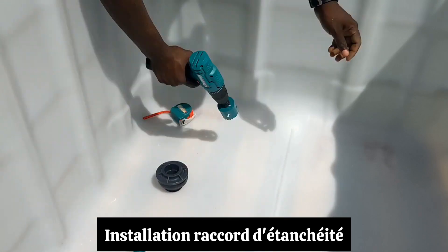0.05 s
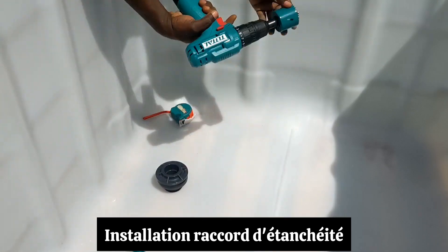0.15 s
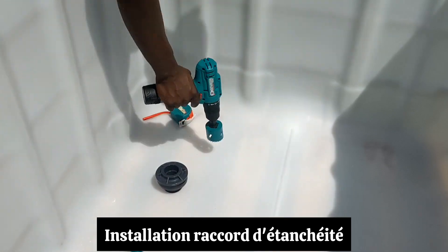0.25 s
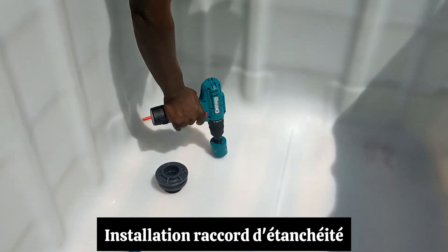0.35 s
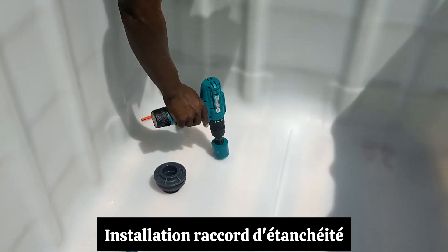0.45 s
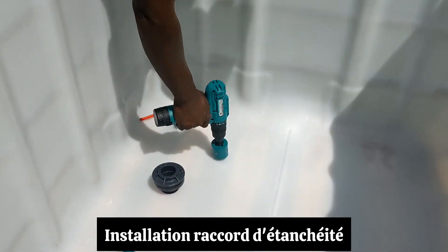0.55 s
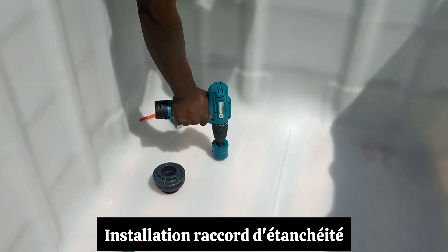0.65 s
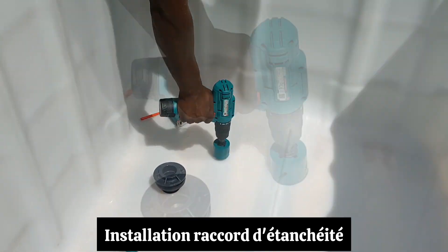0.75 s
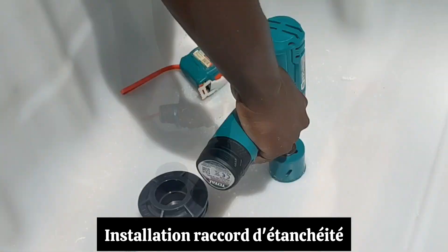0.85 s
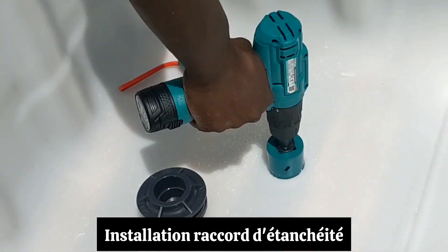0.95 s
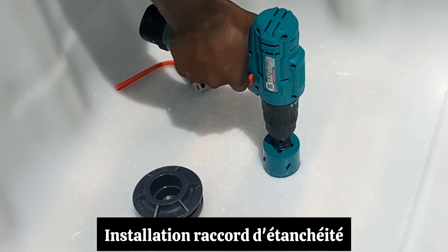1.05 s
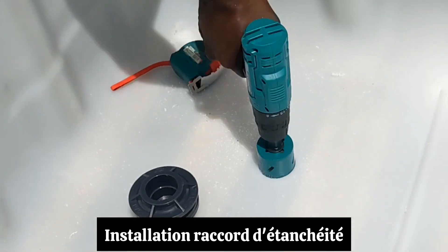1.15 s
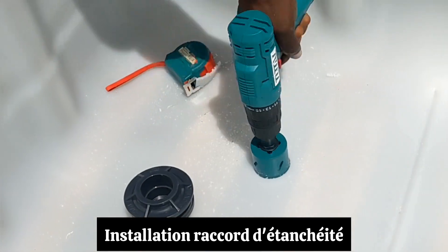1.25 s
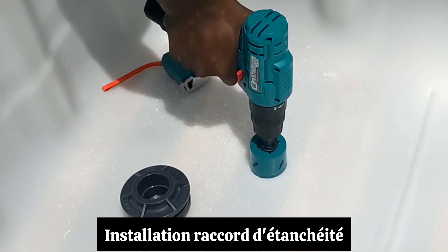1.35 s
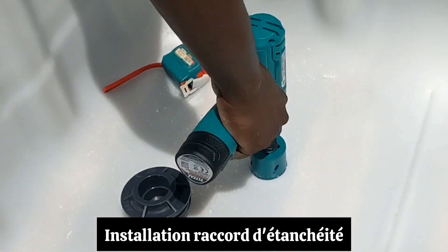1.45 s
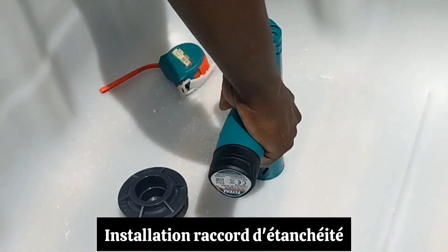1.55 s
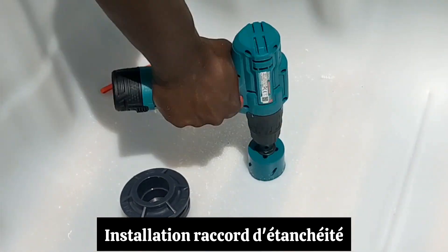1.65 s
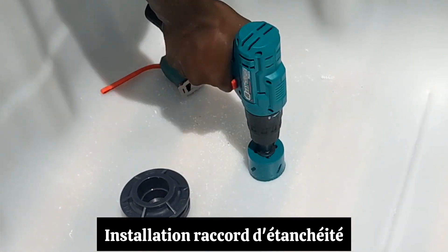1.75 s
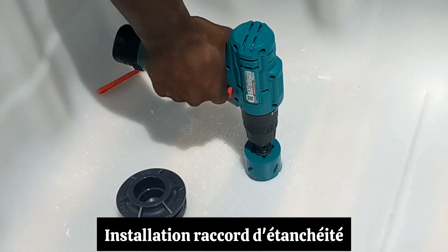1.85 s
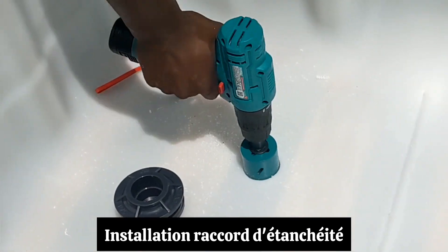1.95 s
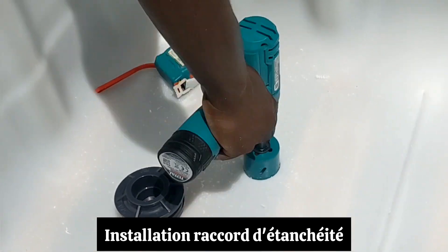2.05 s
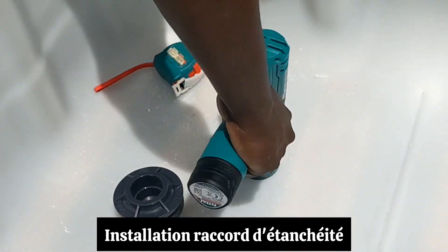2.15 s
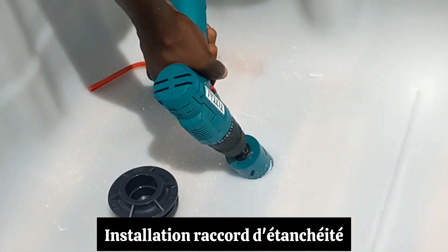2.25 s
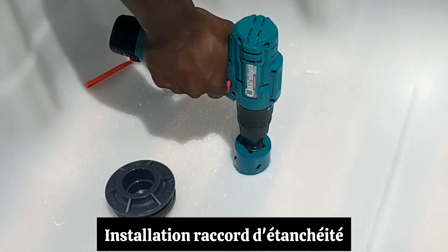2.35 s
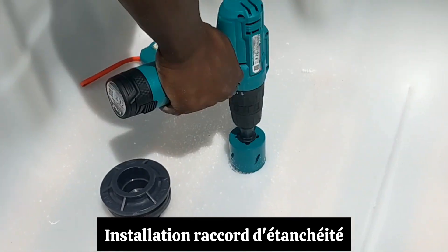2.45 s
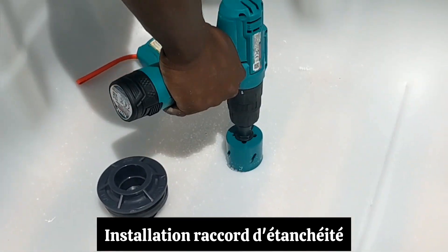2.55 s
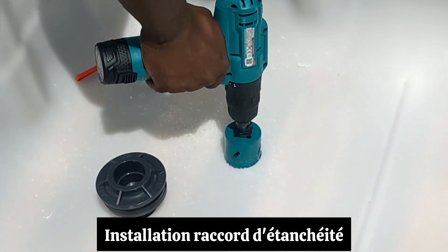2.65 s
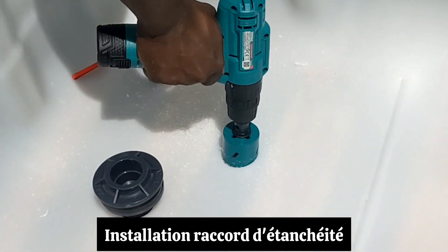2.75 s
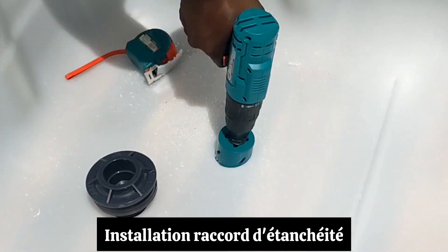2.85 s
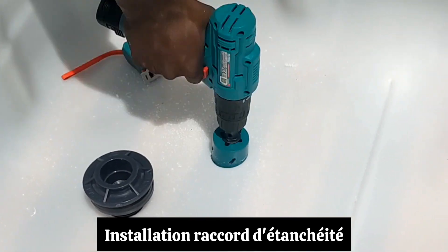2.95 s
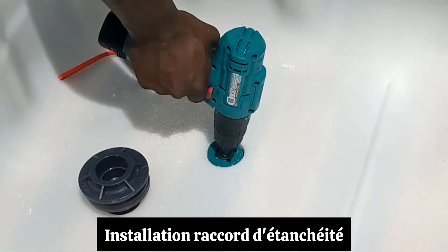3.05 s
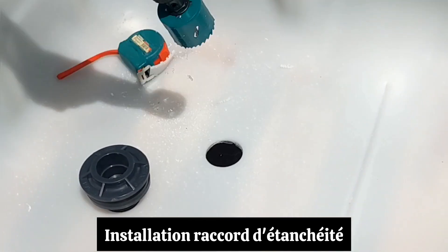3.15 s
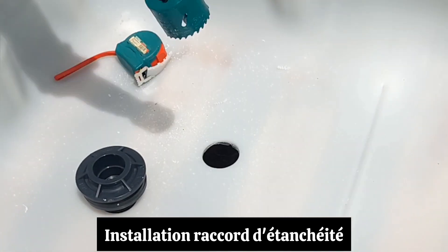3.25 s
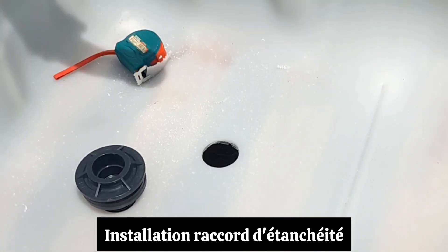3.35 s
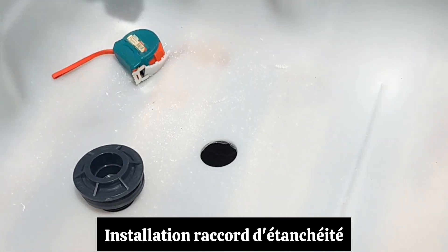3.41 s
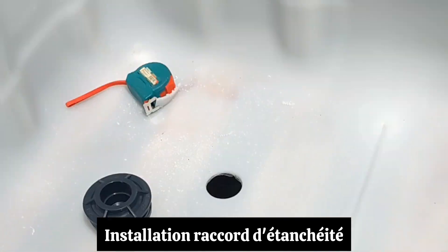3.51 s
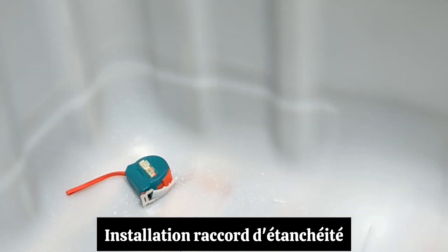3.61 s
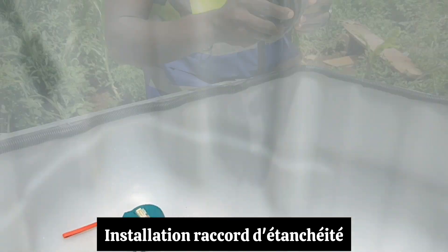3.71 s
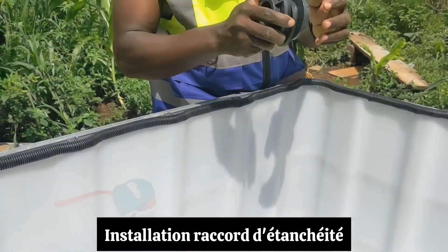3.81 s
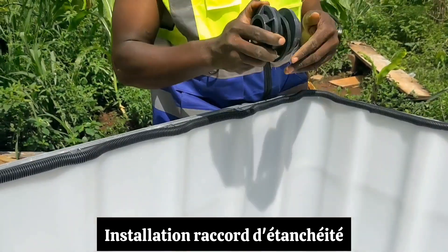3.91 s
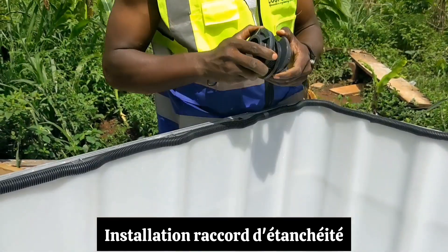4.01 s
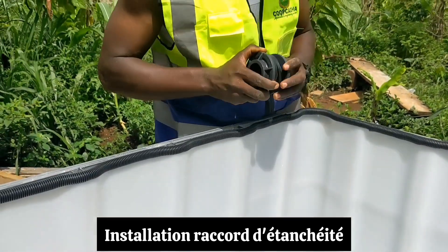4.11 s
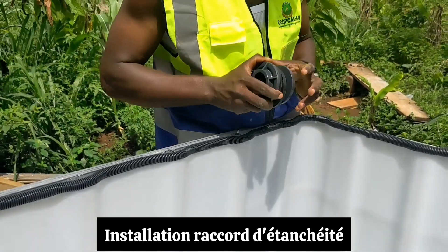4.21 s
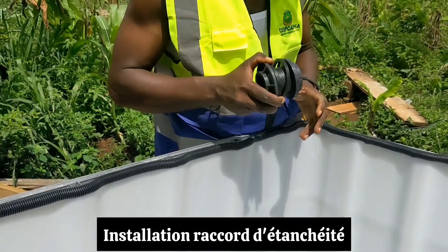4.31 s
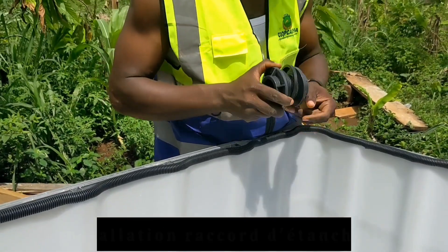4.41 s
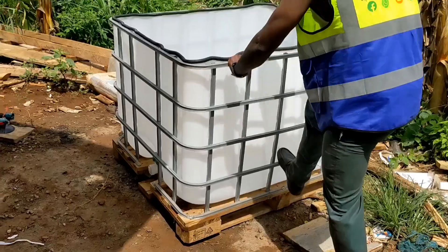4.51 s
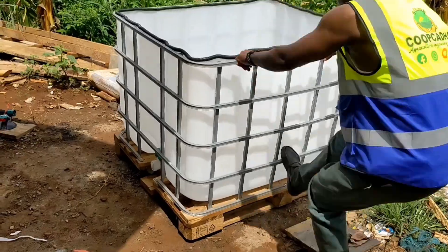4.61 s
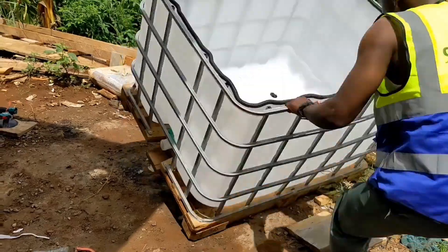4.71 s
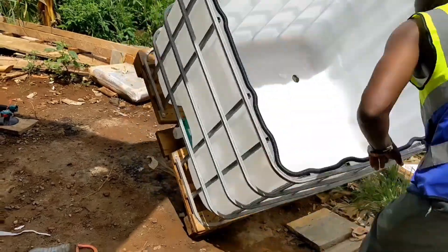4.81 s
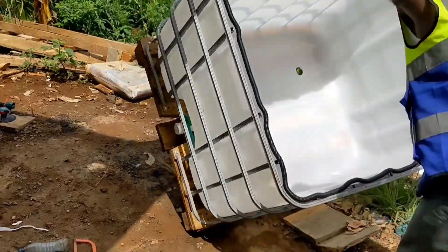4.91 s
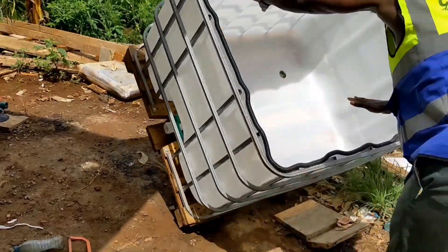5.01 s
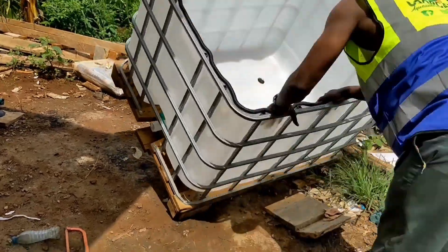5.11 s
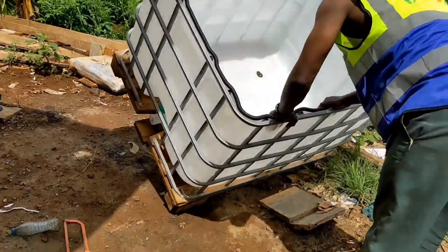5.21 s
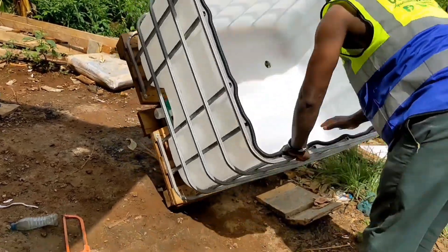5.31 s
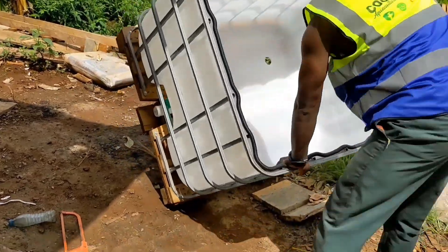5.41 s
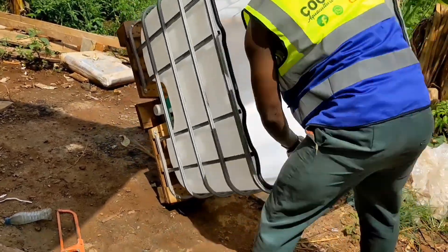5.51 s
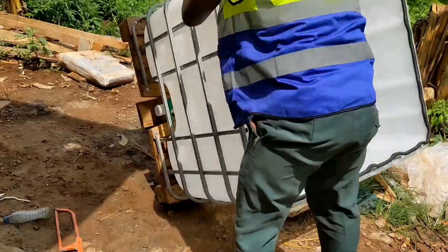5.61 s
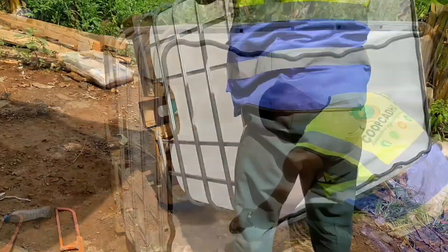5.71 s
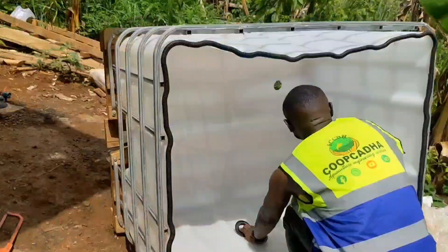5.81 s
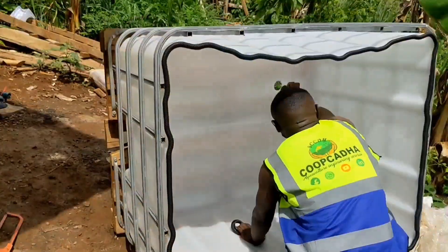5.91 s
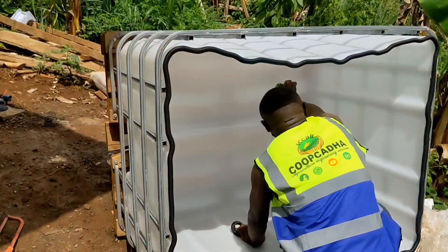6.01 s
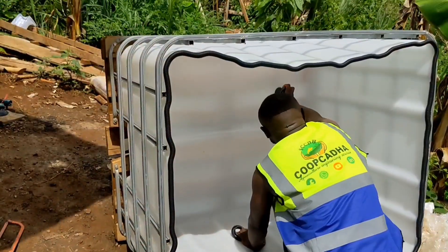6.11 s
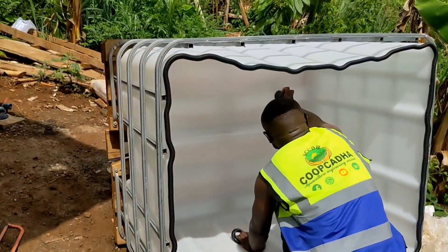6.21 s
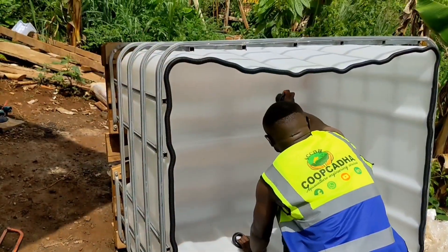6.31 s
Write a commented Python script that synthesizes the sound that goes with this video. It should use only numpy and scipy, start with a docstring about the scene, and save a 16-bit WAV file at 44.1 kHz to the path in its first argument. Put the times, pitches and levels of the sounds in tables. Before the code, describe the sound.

Heard close up outdoors, a cordless drill with a hole saw grinds loudly through a plastic tank, its whine dipping under load while the thin floor drums along. After about two and a half seconds the saw breaks through with a crack, and the drill gives a few short bursts and stops. A light gust and small handling clicks follow, then the tank tips with dull booms, clatter and scraping before settling into faint open air.

```python
"""Hole saw in a plastic tank.

Outdoors, a cordless drill drives a hole saw through the floor of an open tank. The teeth rasp and
throb, the gear whine sags under load, and the thin floor drums in forced vibration. The saw breaks
through and is blipped free. Then wind rumbles, and the caged tank is tipped over: impacts excite its
hollow modes, fittings click, and sliding friction makes a gritty scrape."""
import sys
import numpy as np
from scipy import signal
from scipy.fft import rfft, irfft
from scipy.io import wavfile

SR = 44100
rng = np.random.default_rng(int(sys.argv[2]) if len(sys.argv) > 2 else 0)


def wav_record(signal):
    """Record a signal, one row per channel, as 16-bit PCM in the file named by sys.argv[1]."""
    frames = np.transpose(np.atleast_2d(signal))
    bounded = np.clip(frames, -1, 1)
    # unit amplitude maps onto the largest positive 16-bit level
    quanta = np.round(bounded * 32767).astype(np.int16)
    wavfile.write(sys.argv[1], SR, quanta)


N = 280608
TIME = np.arange(N) / SR
BIN_HZ = np.maximum(np.fft.rfftfreq(N, 1 / SR), 1)

# trigger pulls: (pressed [s], released [s], free-running hiss [dB])
TRIGGER_PULLS = [(0.612, 1.533, -31), (1.596, 1.917, -29.5), (1.976, 3.122, -25.5), (3.253, 3.286, -24),
                 (3.321, 3.379, -24), (3.484, 3.539, -32)]
# drill speed, sagging as the hand pushes: (time [s], gear mesh frequency [Hz])
MESH_SPEED = [(0.92, 2136), (1.02, 2079), (1.13, 2180), (1.4, 2194), (1.63, 1980), (1.745, 1886),
              (1.8, 1988), (1.92, 2017), (1.99, 2150), (2.11, 2104), (2.236, 1940), (2.29, 2130),
              (2.42, 1923), (2.6, 1893), (2.705, 1795), (2.785, 1879), (2.865, 1754), (3.02, 2002)]
# overtones of the whine: (harmonic number, relative level [dB])
MESH_OVERTONES = [(2, 2), (3, -0.5), (4, 3.5), (5, 0), (7, -13)]
# the saw squeals on one harmonic: (start [s], end [s], harmonic number, level [dB])
SAW_SQUEALS = [(0.88, 0.95, 1, -27.5), (1.69, 1.84, 1, -23), (1.73, 1.77, 2, -25), (2.17, 2.24, 1, -27.5),
               (2.44, 2.61, 1, -23), (2.69, 2.73, 1, -21.5), (2.66, 2.88, 2, -26), (2.78, 2.905, 3, -27.5)]
# the saw snags and shakes the floor: (start [s], end [s], drumming level [dB])
SAW_SNAGS = [(1.24, 1.273, -23.5), (1.34, 1.384, -28), (2.0, 2.055, -26.5), (2.23, 2.352, -20.5),
             (3.04, 3.074, -17.5)]
# one floor mode hums under the hardest push: (time [s], level [dB])
FLOOR_HUM_LEVELS = [(2.15, -26), (2.5, -33), (2.64, -19.5), (2.75, -19.5), (2.85, -31.5), (3.0, -35)]
# resonances of saw cup and drill housing: (centre [Hz], width [Hz], gain [dB])
HOUSING_RESONANCES = [(687, 200, 6.5), (958, 52, 3.5), (1075, 80, 0), (2040, 110, -2), (2554, 300, 5),
                      (3570, 220, 1.5), (4380, 40, -5.5), (5620, 170, 2.5), (6600, 150, 1), (7600, 200, 1),
                      (8700, 350, 2)]
# motor chirps: (time [s], duration [s], from [Hz], to [Hz], level [dB], pitch wobble [fraction])
MOTOR_GLIDES = [(0.568, 0.06, 3100, 3140, -39, .012), (0.62, 0.055, 1000, 1060, -40, .015),
                (3.224, 0.03, 3150, 3420, -32, .02), (3.325, 0.045, 3000, 1900, -36, .09),
                (3.36, 0.03, 950, 790, -30, .04), (3.52, 0.03, 760, 560, -34, .06)]
# modes of the tank: (frequency [Hz], level [dB], t60 [s])
TANK_MODES = [(72, -25, .10), (105, -5, 0.11), (139, 3.5, 0.027), (182, -8.5, 0.11), (250, -5, 0.055),
              (325, -7.5, 0.025), (403, -13, .04), (543, -5.5, 0.034), (660, -17, 0.044), (847, -11, .03)]
# blows on the tank: (time [s], level [dB], contact time [s])
TANK_BLOWS = [(0.0, -12.5, 0.0017), (0.126, -41, 0.0049), (0.176, -30, 0.0025), (0.189, -15, 0.0025),
              (0.206, -8, 0.0029), (0.302, -25.5, 0.0014), (0.37, -37.5, 0.0017), (2.254, -5.5, 0.0022),
              (2.322, -18, 0.0016), (3.033, -8, 0.0012), (3.053, -5, 0.0022), (3.085, -13, 0.0024),
              (4.73, -12, 0.001), (4.739, -17, 0.0014), (4.884, -12, 0.00107), (5.018, -15, 0.00098),
              (5.057, -10, .002), (5.101, -14, 0.0013)]
# handling clicks, and cracks as the disc breaks out: (time [s], body [dB], bright edge [dB], t60 [s])
CLICK_EVENTS = [(0.021, -50, -45.5, 0.073), (0.194, -52.5, -60.5, 0.11), (0.304, -40, -55.5, 0.055),
                (3.025, -22, -40, 0.076), (3.065, -21.5, -42, 0.082), (3.2, -60, -54.5, 0.12),
                (3.802, -43, -34, 0.0134), (3.962, -39, -42, 0.021), (4.025, -56, -51, 0.07),
                (4.149, -54, -52, 0.1), (4.389, -60, -56, 0.064), (4.466, -44.5, -54, 0.025),
                (4.512, -44, -52.5, .06), (4.62, -43, -47, 0.0573), (4.737, -37.5, -47, 0.11),
                (4.755, -51, -42, 0.032), (4.803, -50, -51.5, 0.12), (4.876, -34.5, -42, 0.071),
                (4.946, -39, -46, 0.087), (5.018, -21.5, -33, 0.072), (5.032, -25, -29, 0.065),
                (5.067, -29.5, -49, .16), (5.104, -20, -30.5, 0.031), (5.146, -36.5, -44, 0.045),
                (5.255, -52, -62, 0.04), (5.465, -58.5, -57.5, 0.12), (5.585, -52.5, -55, 0.13),
                (5.624, -52.5, -55, 0.14), (5.8, -60, -68, 0.098)]
# lurches of the tipping tank: (time [s], wall flexing [dB], scraping [dB], t60 [s])
TANK_LURCHES = [(4.53, -32, -54, 0.39), (4.739, -17.5, -38.5, 0.14), (4.791, -24, -43.5, 0.43),
                (4.882, -25.5, -40.5, 0.24), (4.975, -27, -42, 0.4), (5.026, -30, -39, 0.4),
                (5.091, -18.5, -38.5, 0.27), (5.48, -45.5, -62, 0.44), (5.815, -55, -82, 0.14)]
# walls settling after a bump, cut or tip: (start [s], end [s], trembling [dB], gritty hiss [dB])
WALL_SETTLING = [(0.0, 0.33, -56, -77), (3.12, 3.578, -49.5, -62), (5.2, 5.624, -50, -69)]
# faint outdoor air: (time [s], level [dB])
AIR_LEVELS = [(0, -58.5), (0.4, -64), (5.6, -61), (5.83, -68.5)]

# noise spectra of the sources: (frequency [Hz], relative spectral density [dB])
TEETH_SPECTRUM = [(900, -4.5), (1500, 0), (1900, 4), (2600, -0.5), (2950, -0.5), (3500, 2), (5900, -3),
                  (6800, -1), (8700, -2.5), (10200, -6.5), (11800, -4.5), (13000, -2), (14100, -1),
                  (15300, -2.5)]
GEARBOX_SPECTRUM = [(300, -28), (520, -4.5), (880, -5.5), (1100, -4), (1450, -13.5), (2000, -6),
                    (3000, -32)]
FLOOR_SPECTRUM = [(25, -33), (45, -10), (75, 0), (110, -2.5), (140, -3.5), (175, 5.5), (205, 3), (228, -3),
                  (270, -3), (370, -1.5), (470, -9), (800, -20.5)]
CLICK_BODY_SPECTRUM = [(120, 3.5), (300, -1), (700, 4), (1500, -4.5), (3000, -11.5), (6000, -39.5)]
CLICK_EDGE_SPECTRUM = [(1000, -29), (2200, 10), (3500, 6), (6500, 1.5), (10500, -7.5), (15000, 0.5)]
FLEX_SPECTRUM = [(25, -23), (55, -10), (85, 3), (108, 7), (150, 0), (200, -7), (270, -10), (400, -17.5),
                 (600, -16.5)]
SCRAPE_SPECTRUM = [(300, -6), (500, -9.5), (700, -4), (950, -9.5), (2250, -11.5), (5200, -28), (6900, -19),
                   (10500, -37), (16000, -31)]
WIND_SPECTRUM = [(25, -25), (50, -3), (68, 4), (80, 11), (110, -11.5), (190, -8), (380, -37), (510, -27.5),
                 (720, -31), (1050, -34), (3300, -45.5), (5000, -54), (10500, -59), (16000, -61.5)]
AIR_SPECTRUM = [(30, -6.5), (110, 0), (300, -22.5), (700, -19.5), (2000, -18), (7000, -20.5),
                (10500, -28.5), (16000, -22.5)]
# stereo balance of the drilling: (frequency [Hz], left minus right [dB])
DRILL_BALANCE = [(60, -1.5), (110, 1), (200, -2), (380, -1), (700, -0.5), (1290, 0), (2380, 0.5),
                 (4400, 0.5), (8120, -2.0), (15000, -5.0)]
# likeness of the noise on the two sides: (frequency [Hz], correlation)
STEREO_CORRELATION = [(60, 1), (130, 0.99), (280, 0.9), (500, 0.34), (1000, 0.012), (4000, 0)]

# load laws: (level at light load [dB], growth with the sag in mesh frequency [dB/Hz])
TEETH_LAW, GEARBOX_LAW, FLOOR_LAW = (-19.5, 0.00062), (-29, 0.005), (-27.5, 0.011)
WHINE_LAW, OVERTONE_LAW = (-33.5, 0.012), (-39.5, 0.012)
LIGHT_LOAD_HZ, THROB_HZ = 2200, 45.4
TOUCH_S, SINK_S, THROUGH_S, BREAK_S = 0.65, 0.27, 3.055, 0.045  # slow entry, sudden breakthrough
ECHO_LAGS_S = [0.0023, 0.0037, 0.0059, 0.0076, 0.0113]


def drill(snag_fade_s=0.077):
    """Forced vibration: the saw binds and frees, modulating teeth, gears and floor at one rate."""
    mesh_hz = np.interp(TIME, *np.transpose(MESH_SPEED))
    running, free, braking = trigger()
    cutting = running * np.clip(np.minimum((TIME - TOUCH_S) / SINK_S, (THROUGH_S - TIME) / BREAK_S), 0, 1)
    snags = sum(undb(db) * envelope(start, end, snag_fade_s, snag_fade_s) for start, end, db in SAW_SNAGS)
    free_shake = undb(-21.5) * free
    throb = np.sin(phase_of(THROB_HZ * (1 + .015 * walk(8.1))))
    # independent excitations add in power
    teeth = np.hypot(cutting * load_gain(TEETH_LAW, mesh_hz), free) * saw_teeth(throb)
    rattle = np.hypot(cutting * load_gain(GEARBOX_LAW, mesh_hz), free_shake + braking) * gearbox(throb)
    drum = np.hypot(cutting * load_gain(FLOOR_LAW, mesh_hz), free_shake + snags) * floor_drum(throb)
    hum = floor_hum()
    reflected = wall_echo(teeth + rattle)
    whine = cutting * gear_whine(mesh_hz, throb)
    return housing(reflected + drum + hum + whine)


def trigger(spin_up_s=0.059, brake_s=0.04, clatter_db=-41.5):
    """Exponential spin-up and braking: gains of the running motor, its hiss and its braking clatter."""
    running, free, braking = np.zeros((3, N))
    for pressed, released, db in TRIGGER_PULLS:
        pull = envelope(pressed, released, spin_up_s, brake_s)
        running += pull
        free += undb(db) * pull
        braking += undb(clatter_db) * envelope(released, released, 2 * spin_up_s, brake_s)
    return running, free, braking


def load_gain(law, mesh_hz):
    """Mechanical loading: the harder the push, the slower the gears and the louder the cut."""
    db, db_per_hz = law
    return undb(db + db_per_hz * (LIGHT_LOAD_HZ - mesh_hz))


def saw_teeth(throb):
    """Fracture noise: the teeth tear chips from the plastic in a throbbing broadband rasp."""
    tearing = unit_rms(undb(1.5 * walk(2500))) * noise(TEETH_SPECTRUM) + .32 * chips()
    return unit_rms(undb(1.6 * throb)) * tearing


def chips(count=2000, t60=0.051):
    """Impulse excitation: chips snap off and ping the saw cup, each at a pitch of its own."""
    out, t = np.zeros((2, N)), TIME[:SR // 25]
    decay = np.exp(-np.log(1000) * t / t60)
    for when, pitch, weakness, *phases in rng.random((count, 5)):
        onset, hz = .6 + 3 * when, 700 + 15000 * pitch
        ping = undb(-np.log(weakness + .03)) * decay
        for side, cycles in zip(out, phases):
            add(side, onset, ping * np.sin(2 * np.pi * (hz * t + cycles)))
    return unit_rms(irfft(rfft(out) * undb(over_bins(TEETH_SPECTRUM)), N))


def gear_whine(mesh_hz, throb, squeal_fade_s=0.21):
    """Periodic tooth meshing gives a harmonic series; the saw's squeals lift single partials."""
    overtone_gain = load_gain(OVERTONE_LAW, mesh_hz)
    partials = {1: load_gain(WHINE_LAW, mesh_hz)}
    partials |= {round(k): undb(db) * overtone_gain for k, db in MESH_OVERTONES}
    for start, end, k, db in SAW_SQUEALS:
        squeal = undb(db) * envelope(start, end, squeal_fade_s, squeal_fade_s)
        partials[round(k)] = np.hypot(partials[round(k)], squeal)
    phase = phase_of(mesh_hz * (1 + .006 * walk(70) + .017 * walk(900) + 0.006 * throb))
    out = np.zeros((2, N))
    for side in out:  # own paths off the walls: level and phase flutter apart on each side
        for k, gain in partials.items():
            flutter = undb(3.4 * walk(110))
            side += gain * flutter * np.sin(k * phase + 0.81 * walk(90))
    return undb(1.2 * throb + 2) * out


def gearbox(throb):
    """Amplitude modulation: the shaken gearbox rattles unevenly in step with the throb."""
    return unit_rms(undb(2.2 * throb + 0.87 * walk(400))) * noise(GEARBOX_SPECTRUM)


def floor_drum(throb):
    """Forced vibration: low, throbbing drumming of the thin floor, with the noise peaks softly limited."""
    drumming = unit_rms(undb(1.3 * throb)) * noise(FLOOR_SPECTRUM)
    return unit_rms(np.tanh(.6 * drumming))


def floor_hum(mode_hz=225):
    """Resonance: under the hardest push the floor hums on a single mode."""
    phase = phase_of(mode_hz * (1 + 0.011 * walk(60)))
    return gain_curve(FLOOR_HUM_LEVELS, fade_s=0.084) * np.sin(phase)


def wall_echo(sound, echo_db=-15, sway_s=0.00006, sway_hz=5):
    """Comb filtering by wall reflections: as the drill sways, some lags grow and others shrink."""
    gain, out = undb(echo_db), sound.copy()
    for heard, direct in zip(out, sound):
        sway = sway_s * walk(sway_hz)
        for k, lag in enumerate(ECHO_LAGS_S):
            heard += gain * np.interp(TIME - lag - (-1) ** k * sway, TIME, direct)
    return out / np.sqrt(1 + len(ECHO_LAGS_S) * gain ** 2)


def housing(sound):
    """Resonant filtering: saw cup and housing colour the sound; each band leans left or right."""
    lift_db = sum(db / (1 + (2 * (BIN_HZ - centre) / width) ** 2)
                  for centre, width, db in HOUSING_RESONANCES)
    balance_db = np.outer([.5, -.5], over_bins(DRILL_BALANCE))
    return irfft(rfft(sound) * undb(lift_db + balance_db), N)


def motor_glides():
    """Pitch follows rotation speed: shaky whistles on starting, falling tones on braking."""
    out = np.zeros((2, N))
    for onset, duration, from_hz, to_hz, db, wobble in MOTOR_GLIDES:
        n = int(duration * SR)
        for side in out:
            shake = undb(3 * walk(400)[:n])
            hz = np.geomspace(from_hz, to_hz, n) * (1 + wobble * walk(545)[:n])
            add(side, onset, undb(db) * shake * signal.windows.tukey(n, .5) * np.sin(phase_of(hz)))
    return out


def knocks():
    """Modal ringing of the struck tank: longer contact is duller, and each spot rings differently."""
    out, t = np.zeros(N), TIME[:SR // 3]
    hz, mode_db, t60 = np.transpose(TANK_MODES)[:, :, None]
    for onset, db, contact_s in TANK_BLOWS:
        detune, colour = rng.standard_normal((2, len(TANK_MODES), 1))
        decay = undb(mode_db + 1.5 * colour) * np.exp(-np.log(1000) * t / t60)
        ring = np.sum(decay * np.sin(2 * np.pi * hz * (1 + 0.061 * detune) * t), axis=0)
        blow = np.convolve(ring, np.hanning(int(contact_s * SR) + 3))
        add(out, onset, undb(db) * blow / np.abs(blow).max())
    # a thin shell radiates little deep bass
    return signal.sosfilt(signal.butter(2, 55, "high", fs=SR, output="sos"), out)


def clicks(rise_share=0.48, grit_db=3):
    """Friction, then impact: cage, pallet and fittings give bursts with a dull body and bright edge."""
    body, edge = np.zeros((2, N))
    for onset, body_db, edge_db, t60 in CLICK_EVENTS + grit_ticks():
        burst = envelope(onset, onset, rise_share * t60, t60)
        body += undb(body_db) * burst
        edge += undb(edge_db) * burst
    grit = unit_rms(undb(grit_db * walk(900)))
    return undb(4.0) * grit * (body * noise(CLICK_BODY_SPECTRUM) + edge * noise(CLICK_EDGE_SPECTRUM))


def grit_ticks(count=10, start=4.2, end=5.55, spread_db=3, t60=0.084):
    """Random impacts: small ticks of grit, as rows like those of CLICK_EVENTS."""
    return [(start + when * (end - start), -52 + spread_db * body, -69 + spread_db * edge, t60)
            for when, body, edge in rng.random((count, 3))]


def tipping(rise_s=0.002, rise_share=0.233):
    """Flexure and sliding friction: at each lurch the walls boom and the pallet scrapes over grit."""
    flex, scrape = np.zeros((2, N))
    for onset, flex_db, scrape_db, t60 in TANK_LURCHES:
        lurch = envelope(onset, onset, rise_s + rise_share * t60, t60)
        flex += undb(flex_db) * lurch
        scrape += undb(scrape_db) * lurch
    grit = unit_rms(undb(3 * walk(60) + 2 * walk(1500)))
    return flex * noise(FLEX_SPECTRUM) + scrape * grit * noise(SCRAPE_SPECTRUM)


def wind(start=3.61, rumble_db=-35.5, rush_db=-43, rush_rise_s=0.24, ease_db_per_s=17):
    """Turbulence: one gust rumbles over the open tank, with a soft rush above that eases off."""
    def gust(rise_s, end, fall_s):
        return np.clip((TIME - start) / rise_s, 0, 1) * envelope(start, end, rise_s, fall_s)

    rumble = gust(rise_s=0.17, end=4.52, fall_s=0.55) * undb(rumble_db + 3.3 * walk(12))
    held_s = np.maximum(0, TIME - start - rush_rise_s)
    rush = gust(rush_rise_s, end=4.55, fall_s=1.6) * undb(rush_db - ease_db_per_s * held_s)
    rush *= unit_rms(undb(2.8 * walk(40)))
    return rumble * noise(WIND_SPECTRUM, hi_hz=289) + rush * noise(WIND_SPECTRUM, lo_hz=374)


def settling(fade_s=0.12, decay_db_per_s=1.5):
    """Damped vibration: the walls tremble on with a gritty hiss after each disturbance."""
    tremble, hiss = np.zeros((2, N))
    for start, end, tremble_db, hiss_db in WALL_SETTLING:
        dying = envelope(start, end, fade_s, fade_s) * undb(-decay_db_per_s * np.maximum(0, TIME - start))
        tremble += undb(tremble_db) * dying
        hiss += undb(hiss_db) * dying
    return tremble * noise(FLEX_SPECTRUM) + hiss * noise(SCRAPE_SPECTRUM)


def air():
    """Ambient noise: faint outdoor air that wavers in level."""
    return gain_curve(AIR_LEVELS, fade_s=0.0464) * undb(2.2 * walk(14)) * noise(AIR_SPECTRUM)


def noise(spectrum, lo_hz=15, hi_hz=20000):
    """Partial coherence: band-limited coloured stereo noise of rms 1, alike on both sides in the bass."""
    lo_hz, hi_hz = max(lo_hz, .8 * spectrum[0][0]), min(hi_hz, 1.25 * spectrum[-1][0])
    rolloff = np.sqrt((1 + (lo_hz / BIN_HZ) ** 8) * (1 + (BIN_HZ / hi_hz) ** 8))
    gain = undb(over_bins(spectrum)) / rolloff
    mid, side = rfft(rng.standard_normal((2, N)))
    correlation = np.clip(over_bins(STEREO_CORRELATION), -1, 1)
    mid, side = mid * np.sqrt(1 + correlation), side * np.sqrt(1 - correlation)
    return unit_rms(irfft(gain * np.array([mid + side, mid - side]), N))


def walk(rate_hz):
    """Random modulation of rms 1 that changes about rate_hz times a second."""
    steps = rng.standard_normal(N // 8)
    return unit_rms(np.interp(TIME * rate_hz, np.arange(len(steps)), steps))


def envelope(start, end, rise_s, fall_s):
    """Exponential growth and decay: up 60 dB in rise_s, full from start to end, down 60 dB in fall_s."""
    out, near = np.zeros(N), slice(*np.searchsorted(TIME, [start - 2 * rise_s, end + 2 * fall_s]))
    outside = np.maximum(0, np.maximum((start - TIME[near]) / rise_s, (TIME[near] - end) / fall_s))
    out[near] = np.exp(-np.log(1000) * outside)
    return out


def gain_curve(rows, fade_s):
    """Interpolated gain from (time [s], level [dB]); outside their span it falls 60 dB in fade_s."""
    times, db = np.transpose(rows)
    outside = np.maximum(0, np.maximum(times[0] - TIME, TIME - times[-1]))
    fade = np.exp(-np.minimum(np.log(1000) * outside / fade_s, 20))
    return undb(np.interp(TIME, times, db)) * fade


def over_bins(points):
    """Interpolation of (frequency [Hz], value) on a logarithmic frequency axis."""
    hz, value = np.transpose(points)
    return np.interp(np.log(BIN_HZ), np.log(hz), value)


def phase_of(hz):
    """Phase as the time integral of frequency."""
    return 2 * np.pi * np.cumsum(hz) / SR


def undb(db):
    """Amplitude ratio from decibels."""
    return np.exp(np.asarray(db) * (np.log(10) / 20))


def unit_rms(x):
    """Normalisation to rms 1."""
    return x / np.sqrt(np.mean(x ** 2))


def add(track, onset_s, sound):
    """Superposition of a sound on a track."""
    start = max(0, int(onset_s * SR))
    track[start:start + len(sound)] += sound[:N - start]


def scene():
    """Superposition of drilling, handling and the open air."""
    return drill() + motor_glides() + knocks() + clicks() + wind() + tipping() + air() + settling()


def record(dry, cutoff_hz=15950):
    """Soft saturation rounds the highest peaks; a steep low-pass cuts the top."""
    rounded = 1.3 * np.tanh(dry / 1.3)
    return signal.sosfilt(signal.ellip(12, .2, 80, cutoff_hz, fs=SR, output="sos"), rounded)


dry = scene()
out = record(dry)
wav_record(out)
```